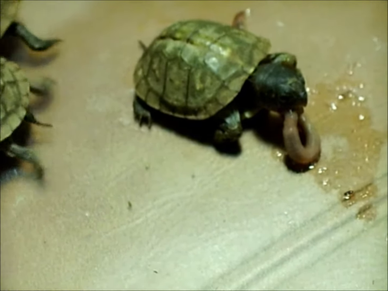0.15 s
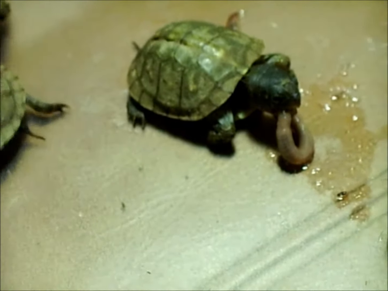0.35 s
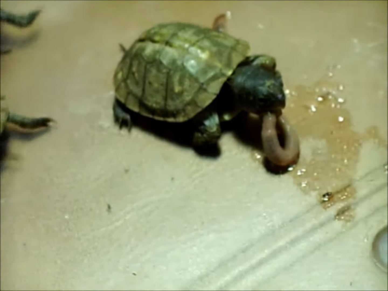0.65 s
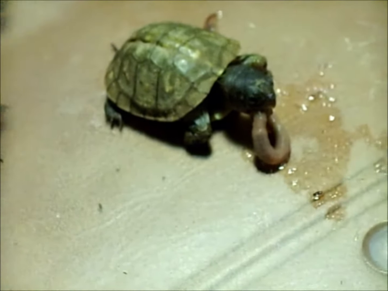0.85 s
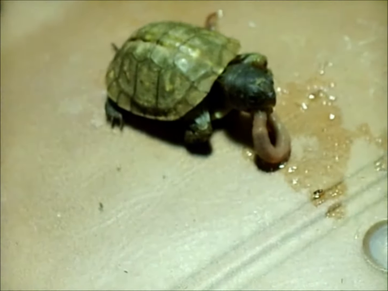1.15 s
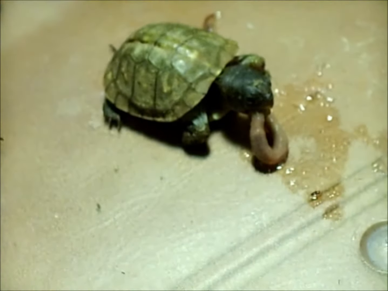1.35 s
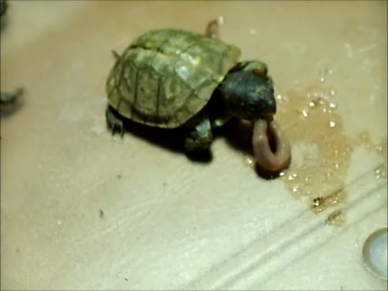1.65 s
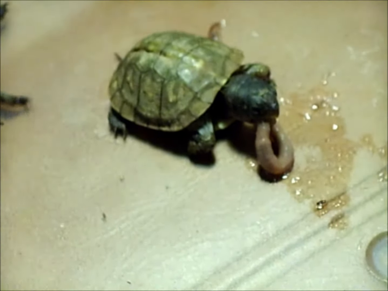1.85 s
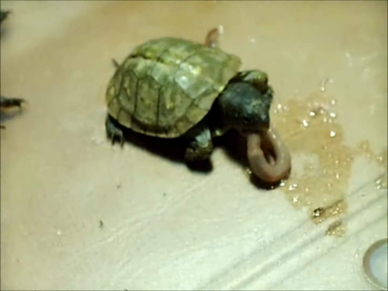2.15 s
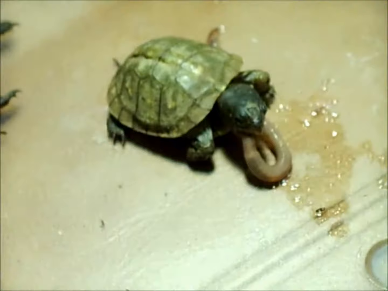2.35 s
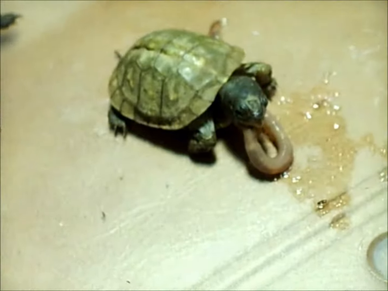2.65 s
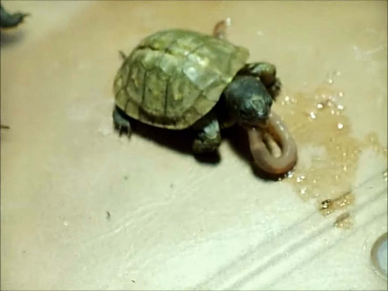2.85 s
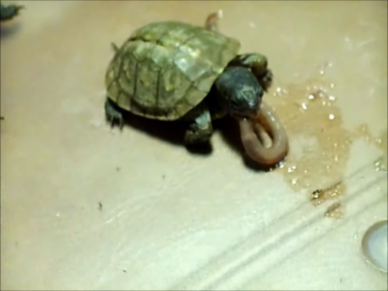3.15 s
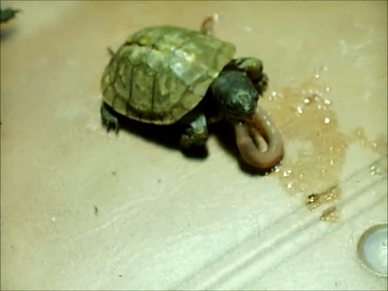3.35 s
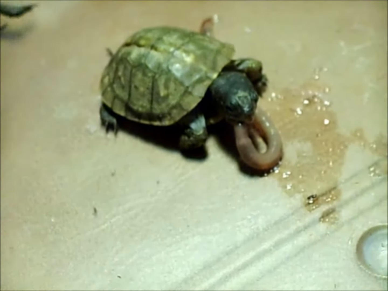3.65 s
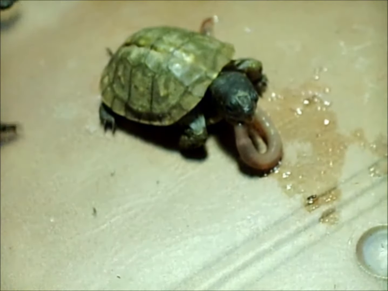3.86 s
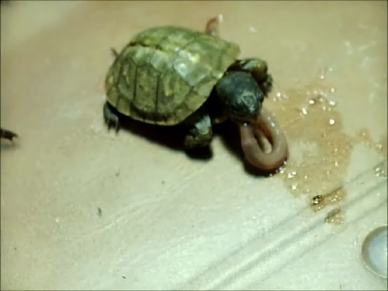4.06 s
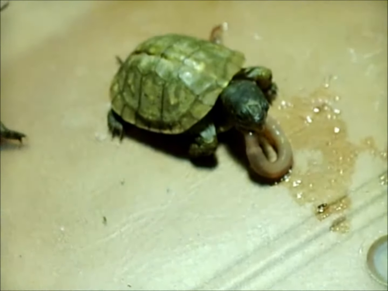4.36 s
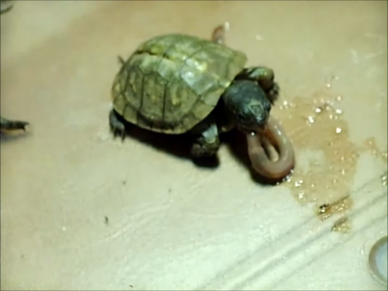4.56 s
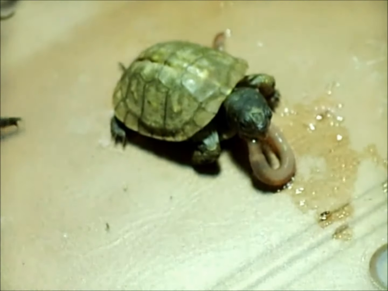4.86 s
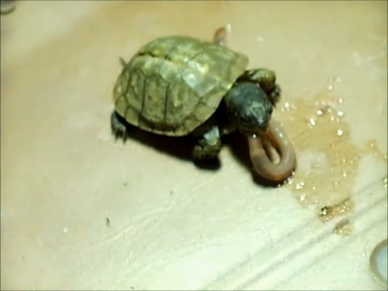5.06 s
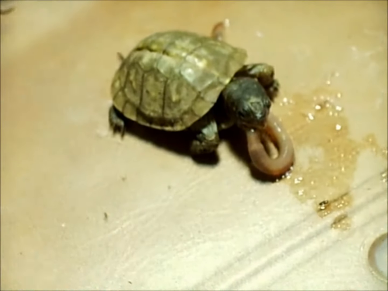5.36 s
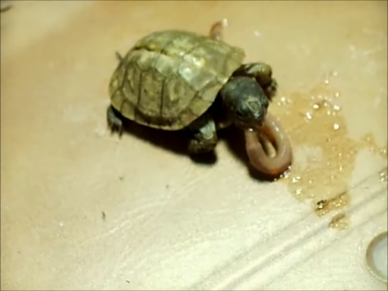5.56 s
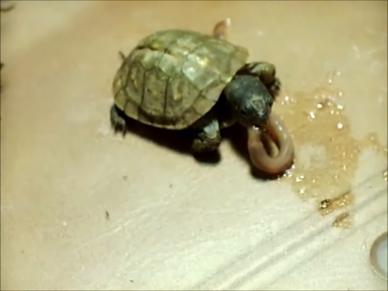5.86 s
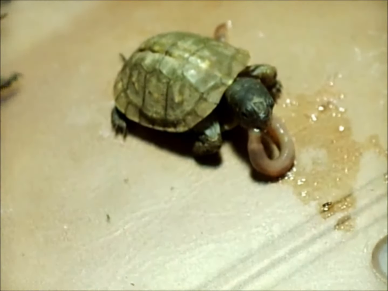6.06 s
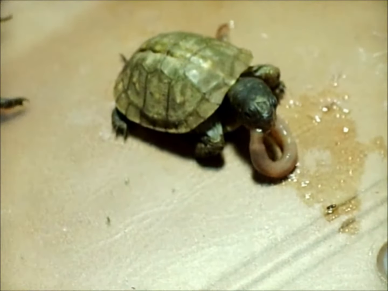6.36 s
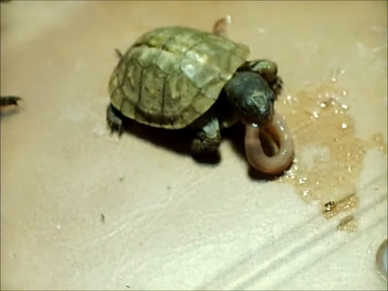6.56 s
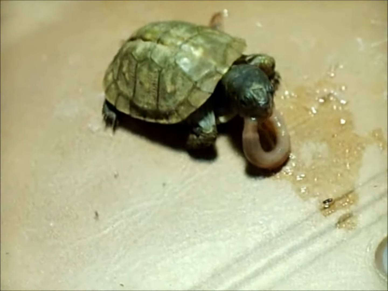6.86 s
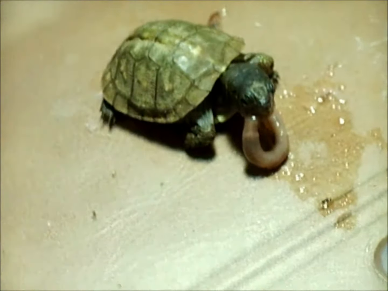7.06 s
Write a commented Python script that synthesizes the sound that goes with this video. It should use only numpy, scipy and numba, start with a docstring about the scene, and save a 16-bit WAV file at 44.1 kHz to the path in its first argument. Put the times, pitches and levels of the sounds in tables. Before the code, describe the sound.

Small turtle claws scrape and tick in irregular bursts on a hard plastic tub floor, heard very close. Light shell or foot knocks sound now and then, the strongest near four seconds. A loose bit of metal tinkles from about three to four and a half seconds, and again between five and six. Faint hiss and a steady thin whine lie beneath.

```python
"""Baby turtles in a plastic tub

Baby turtles scrabble on the tub floor, a small camera held just above them. Dragged claws are filtered
grain noise, claw ticks are short noise bursts, and shell or foot knocks ring the damped modes of the tub.
A loose metal part tinkles as the hand moves: damped modes under a tremble and clinks.
Below lie the camera's filtered-noise hiss and wavering sine lines of hum and whine."""
import sys
import numpy as np
from scipy import signal
from scipy.fft import rfft, irfft
from scipy.io import wavfile
from scipy.ndimage import uniform_filter1d
from numba import njit

SR = 44100
rng = np.random.default_rng(int(sys.argv[2]) if len(sys.argv) > 2 else 0)


def inscribe(sig):
    """Save sig as 16-bit PCM at rate SR to the path in sys.argv[1].

    A 1-D sig is mono; a 2-D sig holds one channel per row.
    Samples are clipped to [-1, 1] before scaling.
    """
    pcm = np.round(np.clip(np.atleast_2d(sig).T, -1, 1) * 32767)
    wavfile.write(sys.argv[1], SR, pcm.astype(np.int16))


N = 317961
TIME = np.arange(N) / SR
STEPS = TIME[::32]  # coarse time grid for levels
TINY = 1e-18  # keeps recursive filters out of denormals


def undb(db):
    """dB to gain."""
    return 10 ** (np.asarray(db) / 20)


def unit(x):
    """Scale to rms 1."""
    return x / np.sqrt(np.mean(x ** 2))


def decay_rate(t60_s):
    """Exponential rate per second that loses 60 dB in t60_s."""
    return np.log(1000) / t60_s


def colour(x, points):
    """Causal minimum-phase filter through (Hz, dB) points, from the cepstrum of the log gain."""
    hz, db = np.transpose(points)
    size = 2048
    bins_hz = np.fft.rfftfreq(size, 1 / SR)
    gain_db = np.interp(np.log(bins_hz + 1), np.log(hz), db)
    cepstrum = irfft(gain_db * np.log(10) / 20)
    cepstrum[1:size // 2] *= 2
    cepstrum[size // 2 + 1:] = 0
    impulse = irfft(np.exp(rfft(cepstrum)))
    return signal.fftconvolve(x, impulse)[..., :N]


def ring(x, hz, t60_s):
    """One damped mode, t60 at least 2 ms; a unit blow rings with peak near 1."""
    r = np.exp(-decay_rate(max(t60_s, .002)) / SR)
    w = 2 * np.pi * hz / SR
    return signal.lfilter([0, np.sin(w)], [1, -2 * r * np.cos(w), r * r], x + TINY)


def walk(rate_hz):
    """Random levels joined by straight slopes, rate_hz levels per second."""
    k = int(SR / rate_hz)
    held = np.repeat(rng.standard_normal(N // k + 1), k)
    return 0.72 * uniform_filter1d(held, k)[:N]


def grains(rate_hz, scatter_db, t60_s):
    """Slips at random moments, a few much larger than the rest, each a short burst of noise; rms 1."""
    happens = rng.random(N) < rate_hz / SR
    size_db = scatter_db * np.minimum(rng.exponential(size=N), 4)
    slips = happens * undb(2 * size_db)
    power = signal.lfilter([1], [1, -np.exp(-2 * decay_rate(t60_s) / SR)], slips)
    return unit(np.sqrt(power) * rng.standard_normal(N))


@njit
def band(x, hz, width_hz):
    """State-variable band-pass with a moving centre, gain 1 at the centre."""
    y, b, l = np.empty(len(x)), 0., 0.
    for i in range(len(x)):
        g, k = np.tan(np.pi * hz[i] / SR), width_hz / hz[i]
        v = (b + g * (x[i] - l)) / (1 + g * (g + k))
        b, l, y[i] = 2 * v - b, l + 2 * g * v, k * v
    return y


def above(x, hz):
    """Steep high-pass."""
    return signal.sosfilt(signal.butter(6, hz, "high", fs=SR, output="sos"), x)


def swell(s, db, rise, hold, fall):
    """Power of each event over time: straight dB slopes up to and down from a hold, 100 dB deep."""
    s, db, rise, hold, fall = (np.reshape(c, (-1, 1)) for c in (s, db, rise, hold, fall))
    before = np.maximum(s - STEPS, 0) / np.maximum(rise, .001)
    after = np.maximum(STEPS - s - hold, 0) / np.maximum(fall, .001)
    return undb(2 * (db - 20 * np.minimum(before + after, 5)))


# Hiss spectrum. Each row: frequency in Hz, relative density in dB per Hz.
HISS_SPECTRUM = [(12, -30), (20, -4), (310, -0.5), (624, 0), (738, 2.5), (825, 1.5), (1120, -1),
                 (1220, 1.5), (1330, 0), (3530, -5), (4540, -9.5), (5680, -4), (7730, -13), (9400, -13),
                 (16000, -15.5)]
# Hum and whine lines. Each row: frequency in Hz, rms level in dB, wavering in dB.
HUM_AND_WHINE = [(58, -79.5, 6), (4680.5, -61.3, 1), (7655, -70.5, 2.5), (7714.5, -68.5, 2),
                 (14041, -71.3, .7)]
HISS_DB = -58  # rms


def camera():
    """Steady hiss of the electronics, with hum and whine lines that waver a little."""
    level_db = HISS_DB + .5 * walk(3.24)
    out = undb(level_db) * unit(colour(rng.standard_normal(N), HISS_SPECTRUM))
    for hz, db, waver_db in HUM_AND_WHINE:
        line = np.sin(2 * np.pi * (hz * TIME + rng.random()))
        out += np.sqrt(2) * undb(db + waver_db * walk(4.2)) * line
    return out


# Modes of the metal part, three groups. Each row: frequency in Hz, relative gain in dB, t60 in seconds.
LOW_MODES = [(3820, 0, .09), (3890, 0, .09), (3968, 0, .1), (4060, 0, .1), (4140, 0, .09), (4210, 0, .08)]
MID_MODES = [(4470, -18, .03), (4777, -8, 0.011), (4900, -28, .04), (4980, -1, 0.076), (5190, -2, 0.024),
             (5330, -6.5, 0.039), (5800, -32, 0.027)]
HIGH_MODES = [(9390, 0, .09), (9712, 0, .1), (10090, 0, .09)]
# Clinks. Each row: time in seconds, low drive in dB, low mode favoured in Hz,
# high drive in dB, high mode favoured in Hz. The low drive also feeds the mid modes.
METAL_CLINKS = [(2.7931, -48.5, 4240, -57, 9320), (3.0091, -42, 3870, -60, 9990),
                (3.0365, -36, 3950, -47, 9500), (3.073, -44, 3820, -66, 9350),
                (3.1727, -42.5, 3970, -54, 9600), (3.2167, -29.5, 4020, -47, 9850),
                (3.2494, -43, 3900, -54, 9730), (3.296, -48, 3970, -63, 9900),
                (3.345, -48, 4040, -62, 9900), (3.3916, -40.5, 3940, -57, 9750),
                (3.6416, -43, 3970, -60, 10000), (3.7257, -34, 3980, -60, 9910),
                (3.8771, -37, 4110, -62, 9700), (3.945, -79, 3940, -43, 9700),
                (3.999, -31.5, 4024, -57, 9700), (4.093, -34.5, 4170, -50, 9750),
                (4.125, -46, 4090, -59, 10000), (4.197, -45, 4110, -61, 9730),
                (4.28, -45.5, 4180, -66, 9290), (4.32, -51, 4050, -69, 9750),
                (5.204, -51, 4220, -67, 10200), (5.3644, -45.5, 4130, -65, 9700),
                (5.4086, -42, 4200, -52, 9800), (5.45, -29, 4050, -56, 10200),
                (5.527, -40.5, 3875, -56.5, 9570), (5.705, -37.5, 3960, -49, 9700),
                (5.7453, -42, 4200, -49, 10100), (5.769, -31, 4024, -43, 9950),
                (5.798, -33, 4110, -45.5, 9540), (5.885, -40.5, 4130, -72, 10100),
                (6.355, -48, 4120, -67.5, 10200)]
# Spells of the hand moving. Each row: start in seconds, end in seconds, low drive in dB, high drive in dB.
HAND_SPELLS = [(2.902, 3.47, -64.5, -84), (3.605, 4.37, -72, -71), (5.13, 5.96, -61, -76),
               (5.994, 6.393, -62, -74)]
SPELL_EDGE_S = 0.022  # per 20 dB
REST_HZ = (4130, 9700)  # low, high: modes favoured between clinks
TREMBLE_DB = (-11.5, -8)  # low, high: re the clink drive
TREMBLE_SWELL_S, TREMBLE_FADE_S = 0.032, 0.11  # per 20 dB


def mode_shares(modes, hz, reach_hz):
    """Modes near the favoured pitch take most of a touch; squared shares sum to 1."""
    near = np.array([np.exp(-((mode_hz - hz) / reach_hz) ** 2) + 0.017 for mode_hz, _, _ in modes])
    return near / np.sqrt(np.sum(near ** 2, axis=0))


def metal_modes(modes, high, reach_hz):
    """One group of damped modes, driven by grain tremble and single clinks."""
    s, *clink = np.transpose(METAL_CLINKS)
    start, end, *spell_db = np.transpose(HAND_SPELLS)
    db, favoured_hz = clink[2 * high], clink[2 * high + 1]
    share = mode_shares(modes, favoured_hz, reach_hz)
    rest_share = mode_shares(modes, REST_HZ[high], 3 * reach_hz)

    # faint tremble through a spell, harder just before and after each clink
    spell = swell(start, spell_db[high], SPELL_EDGE_S, end - start, SPELL_EDGE_S).sum(axis=0)
    power = share ** 2 @ swell(s, db + TREMBLE_DB[high], TREMBLE_SWELL_S, 0, TREMBLE_FADE_S)
    power += np.outer(rest_share ** 2, spell)
    level = np.array([np.interp(TIME, STEPS, np.sqrt(p)) for p in power])
    touch = grains(600, 1.6, 0.0039) * level

    blows = np.full(touch.shape, TINY)
    blows[:, (s * SR).astype(int)] = undb(db) * share
    # noisy chatter, 12 ms time constant
    chatter = signal.lfilter([1], [1, -np.exp(-1 / (0.012 * SR))], blows)
    touch += undb(-2.5) * chatter * rng.standard_normal(N)

    out = np.zeros(N)
    for push, (hz, gain_db, t60_s) in zip(touch, modes):
        # long rings gather more of the noise
        evened = np.sqrt(28 / (t60_s * SR))
        out += undb(gain_db) * evened * ring(push, hz, t60_s)
    return out


def tinkle():
    """A small metal part trembles and clinks; where it is touched decides which mode speaks."""
    low = metal_modes(LOW_MODES, False, 45)
    mid = metal_modes(MID_MODES, False, 5500)
    high = metal_modes(HIGH_MODES, True, 130)
    return above(low + mid + high, 3880)


# Tub modes. Each row: frequency in Hz, gain under a knock in dB, free t60 in seconds.
TUB_MODES = [(548, 1, 0.47), (725, 4, 0.062), (878, 0, 0.12), (1099, 5, 0.08), (1217, 8, 0.044),
             (1327, 4.5, 0.069), (1517, 8.5, 0.029), (1710, 12, 0.024), (1924, 10.5, 0.027),
             (2153, 7, 0.076), (2368, -10, 0.03), (2768, -3, 0.075), (3783, 16, 0.036)]
# Knocks. Each row: time in seconds, drive in dB, favoured pitch in Hz, spread in octaves,
# share of the free ring time.
FLOOR_KNOCKS = [(1.113, -32, 1530, 1.9, 0.52), (1.214, -45.5, 1130, 1.1, 0.28),
                (1.437, -38, 910, 0.82, 0.46), (2.375, -37, 1720, 0.2, 0.55),
                (2.752, -47.5, 2780, .12, 0.56), (3.042, -56, 2280, 0.27, .8),
                (3.9094, -22, 1150, 1.06, 0.55), (3.995, -49, 2780, 0.11, 0.76),
                (6.059, -51, 2780, 0.13, 0.69), (6.684, -38, 870, 0.88, 0.37)]


def knocks():
    """A shell or foot strikes the floor and judders: tub modes near the favoured pitch ring most."""
    out, t = np.zeros(N), TIME[:SR // 4]
    for s, db, centre_hz, octaves, free in FLOOR_KNOCKS:
        push = 0.053 * rng.standard_normal(len(t)) * np.exp(-t / 0.023)
        push[0] = 1
        # a wide contact also cracks and thuds between the modes
        crack_noise = rng.standard_normal(len(t)) * np.exp(-np.minimum(t / 0.0043, 40))
        crack = 0.11 * octaves * ring(crack_noise, 2500, 0.002)
        thud_noise = rng.standard_normal(len(t)) * np.exp(-t / (0.032 * free))
        thud = 0.035 * octaves * ring(thud_noise, centre_hz, 0.0034)
        hit = np.zeros(len(t))
        for k, (hz, mode_db, t60_s) in enumerate(TUB_MODES):
            distance = np.log2(hz / centre_hz) / octaves
            gain = undb(mode_db - 6.1 * distance ** 2)
            hit += (-1) ** k * gain * ring(push, hz, free * t60_s)
        i = int(s * SR)
        out[i:i + len(t)] += undb(db) * above(hit / np.abs(hit).max() + crack + thud, 540)
    return out


# Claw body and treble spectra. Each row: frequency in Hz, relative density in dB per Hz.
CLAW_SPECTRUM = [(2500, -55.5), (4000, -18.5), (4900, -13), (5300, -6), (5800, -4), (6900, -3), (7700, -1),
                 (8400, -7), (9000, -8.5), (11000, -22), (14000, -24)]
TREBLE_SPECTRUM = [(8000, -58.5), (10000, -1), (11800, 6.5), (13000, 7.5), (14500, -3), (16000, -10)]
# Claw ticks. Each row: time in seconds, drive in dB, brightest pitch in Hz, treble in dB re drive.
CLAW_TICKS = [(0.107, -37.5, 8100, -9), (0.1484, -31.5, 7300, -14), (0.188, -44, 7500, -25),
              (0.208, -30, 6050, -20), (0.2707, -37, 7100, -14), (0.3822, -22, 6600, -14),
              (0.4093, -24.5, 6900, -13), (0.5527, -29.5, 7500, -16), (0.574, -34, 7480, -15),
              (0.523, -41, 7300, -18), (0.6155, -38, 7850, -14.5), (0.861, -36, 7120, -10),
              (0.929, -29, 7550, -19), (0.953, -48, 7500, -21), (0.9807, -35, 7500, -10),
              (1.055, -34, 6960, -13), (1.068, -34, 7000, -18), (1.0895, -33, 6070, -24),
              (1.1138, -20.5, 6800, -32), (1.2121, -42, 7600, -28), (1.514, -36, 7860, -19),
              (1.595, -37, 7600, -16), (1.646, -35.5, 6850, -20), (1.6581, -35, 7160, -22),
              (1.813, -26.5, 7750, -15), (1.9858, -32, 7400, -28.5), (2.0716, -32.5, 7500, -16),
              (2.16, -39.5, 7170, -18), (2.2094, -37, 6950, -21), (2.2468, -43.5, 7290, -26),
              (2.32, -35, 7340, -28), (2.38, -30, 5730, -33), (2.7522, -28.5, 6350, -15),
              (2.794, -37, 7650, -31), (2.82, -27, 6270, -19), (3.042, -27.5, 8340, -12.5),
              (3.2161, -29, 5500, -28), (3.419, -35, 6900, -29), (3.6431, -40, 6780, -30),
              (3.857, -35.5, 7460, -24), (3.891, -19.5, 7200, -40), (3.946, -31, 7300, -21),
              (3.9973, -19, 7360, -24), (4.1589, -38, 7000, -12), (4.301, -38, 7100, -17),
              (4.7805, -39, 7540, -24), (4.8189, -32.5, 7000, -16.5), (4.8853, -34, 7000, -17),
              (5.082, -37, 6600, -14.5), (5.4526, -22, 5240, -42), (5.7057, -36, 5600, -24),
              (5.7453, -31, 7660, -23), (5.7678, -24.5, 7460, -31), (5.9585, -40, 6700, -27),
              (5.9938, -39, 6600, -27), (6.0048, -30, 6500, -20), (6.0226, -21, 5440, -28),
              (6.058, -23.5, 7740, -19), (6.162, -28, 6830, -23), (6.2496, -28.5, 7700, -11),
              (6.3328, -34, 7100, -24), (6.6822, -26, 6230, -29), (6.838, -42.5, 7500, -13),
              (6.8802, -36.5, 7950, -8), (6.9193, -39, 7800, -7.5), (6.987, -38.5, 7340, -10.5)]
TICK_T60_S = 0.032


def ticks():
    """Each tick: a hard first crack, then a noisy tail, coloured around its own pitch."""
    body, treble = np.zeros(N), np.zeros(N)
    t = TIME[:SR // 10]
    for s, db, hz, treble_db in CLAW_TICKS:
        noise = rng.standard_normal(len(t))
        noise[:2] = 1.8, -1.8  # two fixed opposite samples give each tick a sharp, equal onset
        tail = noise * np.exp(-decay_rate(TICK_T60_S) * t)
        crack = 0.8 * noise * np.exp(-np.minimum(t / 0.00021, 40))
        burst = tail + crack
        pitched = burst + undb(-13.5) * ring(burst, hz, 0.002)
        i = int(s * SR)
        n = min(len(t), N - i)
        body[i:i + n] += undb(db) * pitched[:n]
        treble[i:i + n] += undb(db + treble_db) * tail[:n]
    return undb(-0.5) * colour(body, CLAW_SPECTRUM) + undb(0.5) * colour(treble, TREBLE_SPECTRUM)


# Floor rub spectrum. Each row: frequency in Hz, relative density in dB per Hz.
RUB_SPECTRUM = [(300, -18), (600, 0), (1100, -1.5), (1700, -0.5), (2800, 1), (3300, 0), (3800, -3.5),
                (4600, 6), (5100, 0.5), (6000, -26.5)]
# Claw strokes. Each row: time of full pressure in seconds, level in dB, swell in seconds per 20 dB,
# hold in seconds, fade in seconds per 20 dB, brightest pitch in Hz, treble in dB re level,
# tub floor in dB re level before a fixed lift. Swells and fades below 1 ms, negative too, act as 1 ms.
CLAW_STROKES = [(0.155, -45.5, .2, 0.013, 0.1, 7600, -14, -9.5),
                (0.272, -46.5, -0.04, 0.034, 1, 7200, -8, -12),
                (0.311, -36.5, 0.03, 0.086, 0.03, 6800, -15.5, -12.5),
                (0.417, -44.5, -0.4, .075, .08, 7000, -15, -14.5),
                (0.51, -53.5, 0.3, .075, 0.2, 7100, -16, -8),
                (0.608, -46.5, -0.2, 0.13, 0.24, 6170, -20, -11.5),
                (0.751, -43, 0.18, 0.091, -0.09, 7000, -15, -12),
                (0.861, -47, -0.07, 0.15, 0.11, 7240, -15.5, -9.5),
                (1.058, -52, -0.05, 0.037, 0.06, 6700, -13, -2),
                (1.413, -48, -0.02, 0.092, 0.1, 7200, -14, -6),
                (1.658, -50, -0.08, .005, -0.28, 6970, -19.5, 1),
                (1.812, -46.5, -0.03, 0.0027, 0.14, 7110, -15, -7.5),
                (1.93, -46, 0.14, .005, 0.32, 7300, -12.5, -8),
                (2.122, -59.5, 0.5, 0.093, 0.1, 6940, -17, -5.5),
                (2.336, -54.5, 0.16, .005, .35, 7070, -12.5, -6.5),
                (2.58, -46.5, 0.1, 0.0062, 0.05, 6600, -13.5, -10.5),
                (2.751, -42.5, -0.05, 0.0081, .02, 6620, -20, -15.5),
                (2.817, -49, -0.18, .005, .48, 6500, -14, -7),
                (3.046, -51, .14, .005, 0.42, 6960, -21, -3.5), (3.22, -56, 0, .005, 0.6, 5420, -27, -15),
                (3.4, -55, 0.1, .005, 0.1, 6760, -21, -5), (3.54, -53.5, 0.13, .1, 1.5, 6700, -12, -5),
                (3.773, -46, 0.14, 0.045, -0.06, 6400, -8, -11.5),
                (3.873, -36, 0.17, 0.047, -0.04, 7100, -14.5, -12),
                (4.011, -39.5, 0.1, 0.0046, .14, 6600, -16, -10.5),
                (4.13, -57, 0.9, 0.05, 1, 6730, -14, -6.5), (4.263, -54, 0, 0.044, 0.27, 6760, -19, -7),
                (4.693, -51.5, 0.3, .005, 0.1, 7140, -18, -11),
                (4.835, -44.5, -0.14, .003, 0.07, 6660, -18, -15),
                (4.905, -42.5, -0.05, 0.0043, -0.01, 6760, -13.5, -12),
                (5.105, -56.5, 0.3, .005, 0, 7050, -17, -7), (5.293, -59.5, 0.6, 0.11, 3, 6700, -15, -2),
                (5.447, -45, -0.01, .005, 0.11, 6760, -22, -10.5),
                (5.761, -42.5, -0.03, .005, 0.1, 7050, -18, -13.5),
                (6.027, -38, 0.03, 0.041, 0.01, 7100, -17, -12.5),
                (6.071, -51, -0.28, .02, -0.07, 7000, -12, -5),
                (6.157, -33, -0.06, 0.015, .11, 7540, -29, -19.5),
                (6.209, -43.5, -0.06, 0.021, 0.04, 6950, -3, -1.5),
                (6.258, -39, 0, 0.086, 0.01, 7200, -17, -15.5),
                (6.353, -56, -0.1, 0.031, .2, 6900, -19, -6), (6.452, -58.5, 0, 0.19, 0.9, 6750, -19, -6),
                (6.654, -53, 0.16, 0.0042, -0.26, 6600, -15, -3)]
# Faint unceasing shuffle: level in dB, brightest pitch in Hz, treble and tub floor as in the strokes.
FAINT_SHUFFLE = (-67.5, 7200, -23, -1.5)
LINGER_DB, LINGER_S = -9, .09  # after-sound of a stroke: re its power, per 20 dB
FLOOR_LIFT_DB = 1.5


def drag():
    """Stick-slip of claw tips: the same slips speak in three ranges; their loudness flutters."""
    s, db, rise, hold, fall, *columns = np.transpose(CLAW_STROKES)
    shuffle_db, *shuffle_columns = FAINT_SHUFFLE
    power, rest = swell(s, db, rise, hold, fall), undb(2 * shuffle_db)
    # the tub keeps a little of each stroke after the claw lifts
    keep = undb(-40 * STEPS[1] / LINGER_S)
    power += undb(2 * LINGER_DB) * signal.lfilter([1 - keep], [1, -keep], power)
    total = power.sum(axis=0) + rest
    level_db = np.interp(TIME, STEPS, 10 * np.log10(total))

    def blend(column, at_rest):
        """Power-weighted mean: the strongest stroke of the moment dominates."""
        return np.interp(TIME, STEPS, (column @ power + at_rest * rest) / total)

    bright_hz, treble_db, floor_db = map(blend, columns, shuffle_columns)

    slips = grains(1500, 2.1, 0.019) * undb(4.2 * walk(45))
    slips = slips + undb(-8.5) * grains(90, 2.8, 0.0067)  # sparser, sharper crackle, about 90 grains/s
    # the patch of floor under the claw adds a resonance that wanders with it
    resonance = undb(0.5) * band(slips, bright_hz, 320.0)
    claw = unit(colour(slips + resonance, CLAW_SPECTRUM))
    treble = unit(colour(slips, TREBLE_SPECTRUM))
    # the floor hisses broadly and hums in the same modes that a knock rings
    rub = unit(colour(slips, RUB_SPECTRUM))
    hum = unit(sum(hz / 1000 * ring(slips, hz, t60_s) for hz, _, t60_s in TUB_MODES))
    floor = unit(rub + 0.49 * hum)
    layers = claw + undb(treble_db) * treble + undb(floor_db + FLOOR_LIFT_DB) * floor
    return undb(level_db) * layers


def scene():
    """One microphone feeds both channels."""
    mono = drag() + ticks() + knocks() + tinkle() + camera()
    return np.tile(mono, (2, 1))


TOP_HZ = 15750


def record(dry):
    """The recorder cuts the top steeply: an elliptic low-pass."""
    return signal.sosfilt(signal.ellip(10, .2, 60, TOP_HZ, fs=SR, output="sos"), dry)


dry = scene()
out = record(dry)
inscribe(out)
```